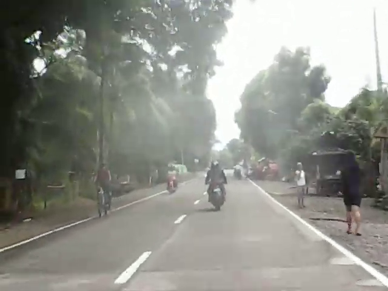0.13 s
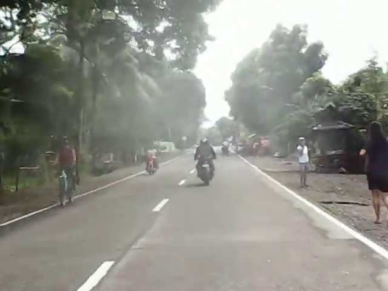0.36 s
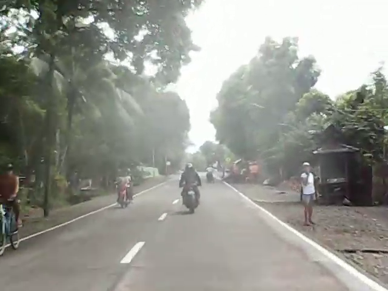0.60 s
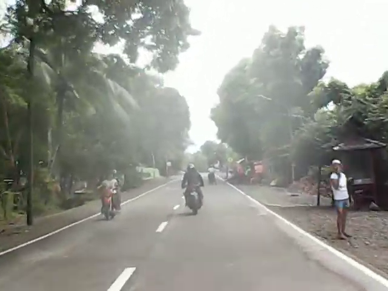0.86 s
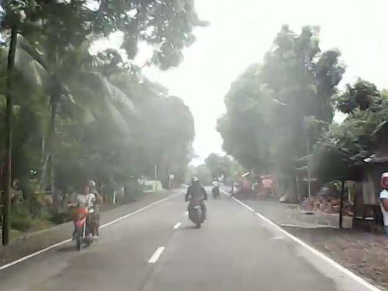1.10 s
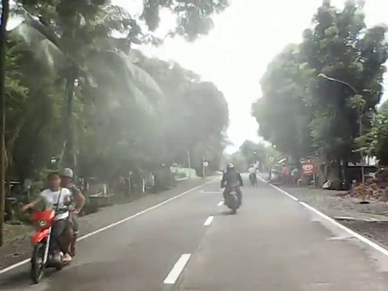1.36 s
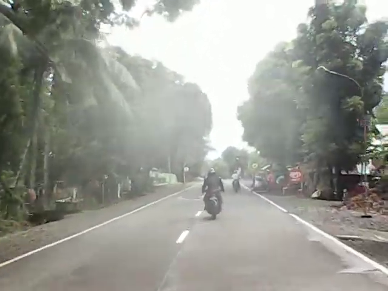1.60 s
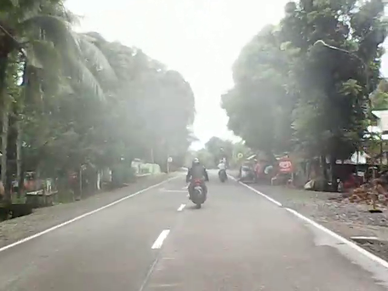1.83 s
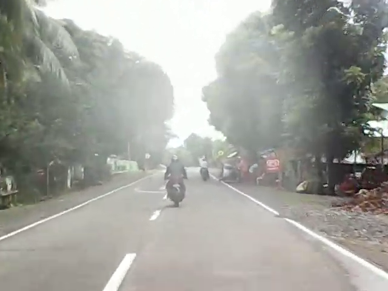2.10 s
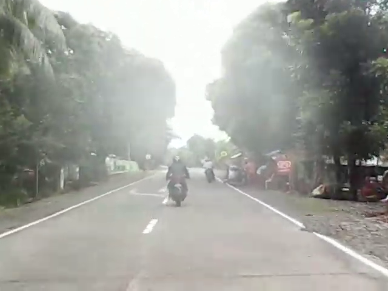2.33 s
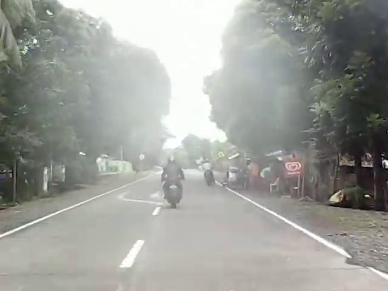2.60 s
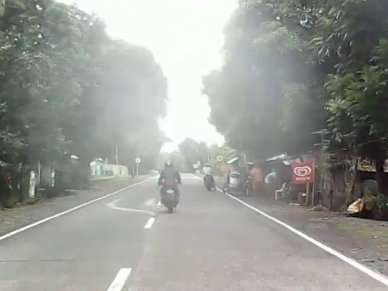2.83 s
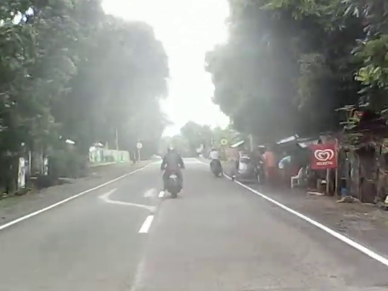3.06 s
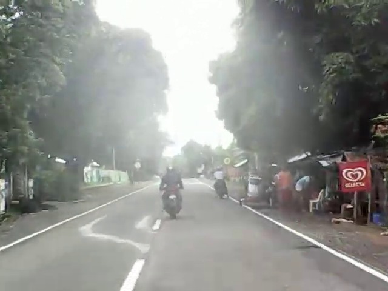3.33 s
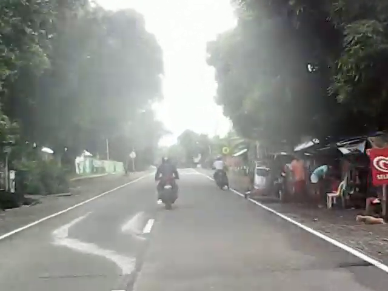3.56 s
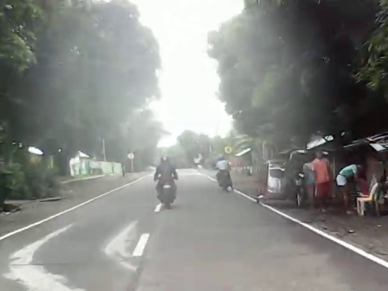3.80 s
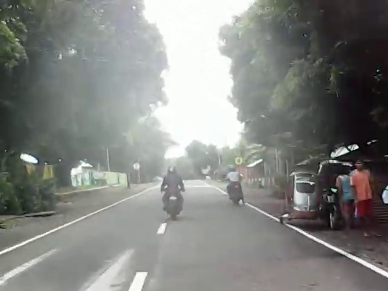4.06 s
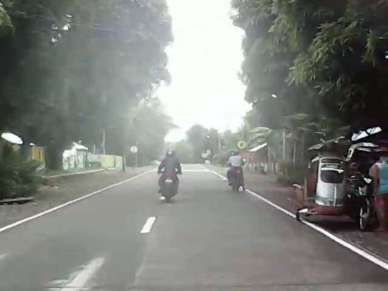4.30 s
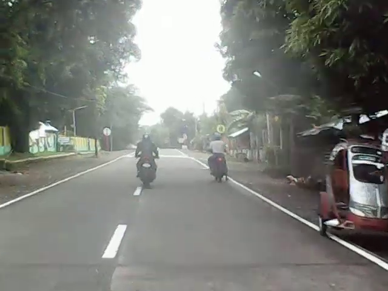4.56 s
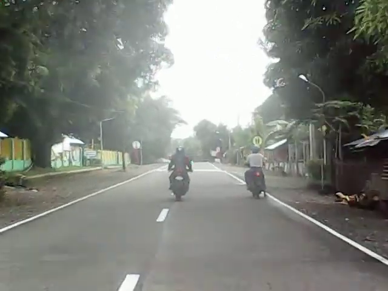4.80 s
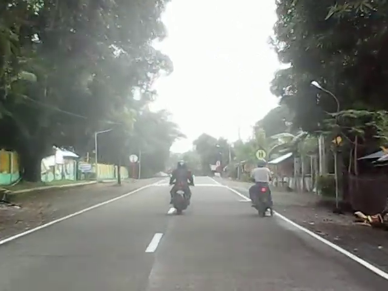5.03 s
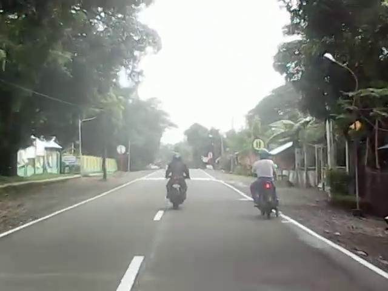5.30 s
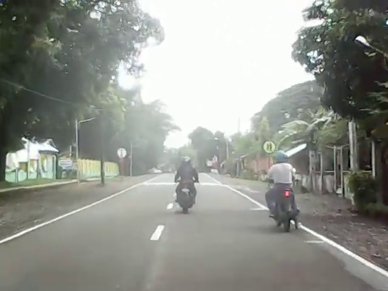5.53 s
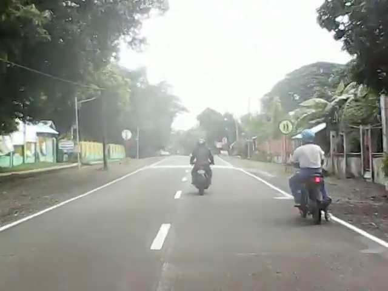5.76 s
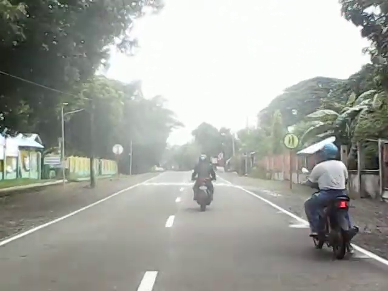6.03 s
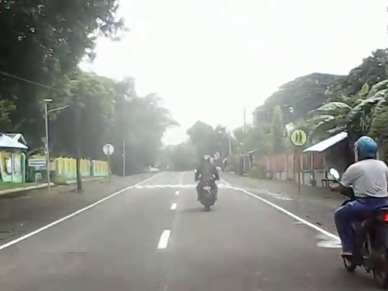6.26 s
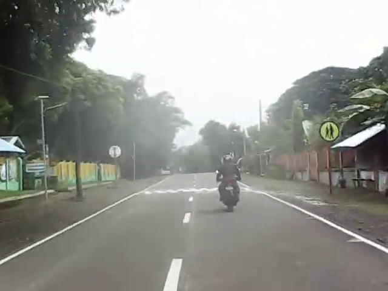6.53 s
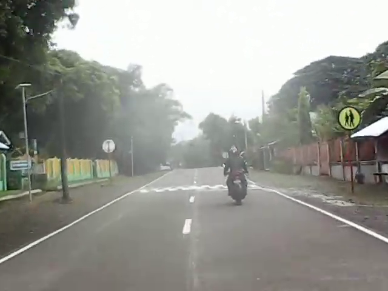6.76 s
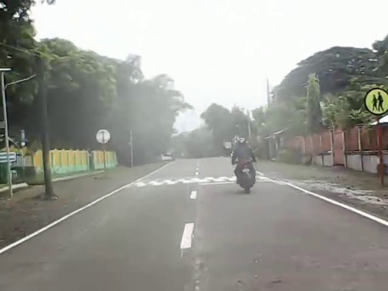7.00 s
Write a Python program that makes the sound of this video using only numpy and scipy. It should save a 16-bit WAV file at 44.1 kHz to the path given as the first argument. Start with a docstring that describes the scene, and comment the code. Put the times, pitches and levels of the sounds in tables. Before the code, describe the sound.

From a moving motorcycle on a country road, a broad tyre and exhaust roar runs throughout, swelling and wavering, with hissing spray and low wind buffeting the microphone. A steady engine hum and faint whine sit inside it. A loose part ticks sharply at irregular moments and bumps give dull thuds. A short double horn toot comes near three seconds, another past five and a half.

```python
"""Tyre roar swells and wavers along a wet road: shaped noise, puffed at the engine firing rate.
Water spray hisses with it, low wind noise buffets the microphone, bumps jolt the frame (short sines).
The engine hums in firing-rate orders, with a narrow-band noise gear whine.
A loose part ticks (a ringing knock with rebounds); a horn of rising partials gives two double toots."""
import sys
import numpy as np
from scipy import signal
from scipy.io import wavfile
from scipy.ndimage import uniform_filter1d

SR = 44100
rng = np.random.default_rng(int(sys.argv[2]) if len(sys.argv) > 2 else 0)


def master(y):
    """Save y as 16-bit WAV."""
    cut = np.clip(np.atleast_2d(y).T, -1, 1)
    pcm = np.round(cut * 32767)  # scale
    wavfile.write(sys.argv[1], SR, pcm.astype(np.int16))


def gain_from_decibels(decibels):
    """Convert decibel values to linear amplitude factors."""
    exponent = np.asarray(decibels, float) / 20
    return 10 ** exponent


N = 314433

# road swell, shared by roar, spray and wind: time_s, roar_band_level_db
ROAD_SWELL = [(0.0, -40), (0.14, -49), (0.22, -42.5), (0.42, -43), (0.46, -42), (0.67, -44), (0.74, -39),
              (0.85, -48), (0.92, -40), (0.99, -43.5), (1.05, -40), (1.13, -44), (1.22, -41.5), (1.3, -43),
              (1.42, -40.5), (1.85, -41), (2.0, -40), (2.3, -41.5), (2.57, -44), (3.05, -40.5),
              (3.41, -44.5), (3.57, -41.5), (3.68, -43), (4.0, -40.5), (4.1, -42), (4.31, -41), (4.62, -43),
              (4.8, -40.5), (4.95, -40), (5.02, -44.5), (5.17, -39.5), (5.4, -42.5), (5.7, -40.5),
              (5.8, -43.5), (6.03, -44.5), (6.5, -42.5), (6.84, -44.5), (6.9, -43), (7.13, -43)]
# roar band in which the road level holds: low_hz, high_hz
ROAR_BAND_HZ = (1120, 1440)
# relative noise densities of tyre roar, wind and spray: frequency_hz, density_db_per_hz
ROAR_SPECTRUM = [(71, -25.5), (120, -13.5), (178, -13), (290, 2.5), (420, -2.5), (454, 1), (623, -5),
                 (866, -4.5), (1000, -7), (1070, -7.5), (1370, -11), (1510, -8), (1910, -19.5),
                 (2420, -25.5), (2800, -26.5), (3640, -51.5), (6160, -120)]
WIND_SPECTRUM = [(15, -26.5), (40, -10), (90, -0.5), (140, 1), (220, -1), (350, -11), (600, -25.5),
                 (1000, -42)]
SPRAY_SPECTRUM = [(1180, -26.5), (2000, 0), (2360, -8), (2900, -6.5), (3350, -7), (3650, -4), (3900, -0.5),
                  (4400, -7), (6190, -21), (6710, -21), (7000, -25), (7230, -33), (9400, -60.5),
                  (15900, -120)]
# wind level and roar depth: time_s, wind_level_db (at mean road level), roar_depth_db_per_octave
GUSTS = [(0, -36.5, 0), (.7, -35.5, 1), (1.5, -40.5, 0.85), (2.4, -39, -0.1), (3.5, -36, -0.1),
         (4.7, -36.5, 0.3), (5.6, -38.5, -0.36), (6.2, -40, 0.1), (7.13, -40, 0.1)]
# engine speed: time_s, firings_per_s
FIRING_RATE = [(0, 34.8), (2, 34.9), (4.5, 34.97), (6.2, 35.1), (7.13, 35.35)]
# engine orders: multiple_of_firing_rate, nominal_level_db_rms
ENGINE_ORDERS = [(1, -62), (2, -58.5), (4, -48.5), (5, -64), (6, -55.5), (7, -55), (8, -49), (10, -62.5),
                 (11, -56), (13, -45.5), (14, -48), (16, -56.5), (20, -56)]
# gear whine: centre_hz, width_hz, level_db_rms
GEAR_WHINE = (1087, 14, -47.5)
# jolts over bumps: start_s, envelope_peak_db, pitch_hz
JOLTS = [(0.309, -29, 140), (0.559, -27, 170), (0.693, -29, 126), (1.059, -31, 106), (2.248, -27.5, 117),
         (2.384, -25, 141), (3.48, -27, 98), (4.839, -28.5, 197), (5.487, -30, 90), (5.928, -29.5, 195),
         (6.198, -26, 93)]
# knocks of the loose part: start_s, peak_db, brightness_db_per_octave, low_body_db
KNOCKS = [(0.2151, -22.5, 5, 8), (0.2155, -22, 0, 2.5), (0.2224, -33, -1, -2.5), (0.2374, -34, -2, 5.5),
          (0.331, -29, -3, 2), (0.5846, -28, -8, 2.5), (0.6373, -33, -9, -4), (0.9365, -18.5, -4, 2.5),
          (0.9512, -39, -4.5, -1), (1.0628, -19.5, -4, -0.5), (1.089, -35, 0, 0), (1.5746, -29, -2, 4),
          (1.6535, -31, -7, 0), (2.228, -29, 2, -3), (2.4101, -28, 3, 1.5), (3.0364, -35, 2, 0),
          (3.3298, -26, 4.5, 0), (3.4147, -31.5, -1.5, -3), (3.426, -35.5, -5, -3), (3.4991, -22, 2, 2),
          (3.5662, -27.5, -3.5, -1), (3.689, -27, -6.5, -1), (4.059, -32.5, -12, -7),
          (4.1203, -33.5, -1, -2), (4.128, -37, -3, -2), (4.334, -31, 4, -3), (4.3617, -32.5, -4.5, 1.5),
          (4.727, -23, -1, -2.5), (5.0212, -29.5, 0.5, 2.5), (6.2835, -31, -6, 3), (6.3839, -22, 2, 1),
          (6.39, -32.5, -2, -2), (6.652, -20, -2, -4), (6.893, -22.5, -1.5, 0), (6.899, -33.5, -2.5, -2)]
# colour of one knock (low body, notch, ringing edge, broad crack): frequency_hz, gain_db
KNOCK_COLOUR = [(300, -24.5), (1000, -16), (1700, -3.5), (2600, -2), (3300, -20), (3750, -5.5), (4000, 8),
                (4500, 1), (5300, -3), (6200, -16), (7000, -32), (9000, -39)]
# late onset of the ringing edge: edge_hz, width_hz, lag_s
RING_LAG = (4000, 700, .0009)
# horn presses: down_s, up_s, level_db, upper_partial_drift_db, extra_fundamental_db
TOOTS = [(2.930, 2.994, -24, -3.5, 0), (3.092, 3.137, -23.5, -2, -0.5), (5.495, 5.578, -24.5, -4.5, 0.5),
         (5.652, 5.7, -28, -0.5, 4.5)]
# horn partials: multiple_of_pitch, relative_level_db
HORN_PARTIALS = [(1, -4.5), (2, -0.5), (3, -20), (4, -4), (5, -13.5), (6, -30), (7, -22), (8, -19.5)]
# horn pitch: start_hz, settled_hz, settling_time_s
HORN_PITCH = (496, 506.8, .03)

MEAN_ROAD_DB = -40.5
FLUTTER_DB, FLUTTER_PER_S = 0.99, 27.3  # quick random wavering of the road level
SPRAY_OFFSET_DB, SPRAY_FOLLOWS = -6, 0.93  # re mean road level; share of swell followed
WIND_FOLLOWS = 0.36  # share of swell followed
LUMPS_DB, LUMPS_PER_S = 1, 16  # random wind lumps
DEPTH_DB_PER_OCTAVE, DEPTH_PER_S = 0.54, 5  # random drift of roar depth
JOLT_RISE_S = 0.0065
REBOUND_SIZE, REBOUND_DECAY_MS = 0.07, 2.1
RECORDER_EDGE_HZ = 7160


def evened(x):
    """Scales to rms 1."""
    return x / np.sqrt(np.mean(x ** 2) + 1e-20)


def curve(rows, column):
    """One column of a time table, interpolated per sample."""
    rows = np.asarray(rows, float)
    return np.interp(np.arange(N) / SR, rows[:, 0], rows[:, column])


def wander(per_s):
    """Twice-averaged white noise: slow smooth drift of rms 1."""
    size = max(int(SR / per_s), 1)
    once = uniform_filter1d(rng.standard_normal(N), size)
    return evened(uniform_filter1d(once, size))


def noise(spectrum, patchy_db, flicker_db, size=1024, tilt_db=0):
    """Random short-time spectra: drifting patches, flicker shared by all bins, tilt about 500 Hz."""
    frames, hz = 4 * N // size + 5, np.fft.rfftfreq(size, 1 / SR)
    real, imag, patches = rng.standard_normal((frames, len(hz), 3)).T
    patches = uniform_filter1d(patches, 10, 0)
    patches = evened(uniform_filter1d(patches, 8, 1))
    flicker = evened(uniform_filter1d(rng.standard_normal(frames), 3))
    table_hz, table_db = np.transpose(spectrum)
    colour_db = np.interp(np.log(hz + 1), np.log(table_hz + 1), table_db, right=-120)[:, None]
    frame_tilt_db = np.resize((tilt_db * np.ones(N))[::size // 4], frames)
    colour_db = colour_db - np.log2((hz[:, None] + 1) / 500) * frame_tilt_db
    gain = gain_from_decibels(colour_db + patchy_db * patches + flicker_db * flicker)
    sound = signal.istft((real + 1j * imag) * gain, nperseg=size, noverlap=3 * size // 4)[1]
    return evened(sound[:N])


def road_db():
    """Road noise level: swell plus quick wavering."""
    return curve(ROAD_SWELL, column=1) + FLUTTER_DB * wander(FLUTTER_PER_S)


def firing_turns():
    """Firings counted over time: the integral of the firing rate."""
    return np.cumsum(curve(FIRING_RATE, column=1)) / SR


def wind(level_db):
    """Lumpy low pressure swings at the microphone, partly following the road swell."""
    swell_db = WIND_FOLLOWS * (level_db - MEAN_ROAD_DB)
    gust_db = curve(GUSTS, column=1) + swell_db + LUMPS_DB * wander(LUMPS_PER_S)
    return gain_from_decibels(gust_db) * noise(WIND_SPECTRUM, patchy_db=-0.2, flicker_db=2.0)


def engine_hum():
    """Sine orders of the firing rate, each wavering in strength."""
    turns = firing_turns()
    hum = np.zeros(N)
    for order, level_db in ENGINE_ORDERS:
        gain = gain_from_decibels(level_db + 2.8 * wander(4.6)) * np.sqrt(2)
        hum += gain * np.cos(2 * np.pi * (order * turns + rng.random()))
    return hum


def gear_whine():
    """White noise through a two-pole resonator: a fuzzy tone."""
    hz, width_hz, level_db = GEAR_WHINE
    radius = np.exp(-np.pi * width_hz / SR)
    poles = [1, -2 * radius * np.cos(2 * np.pi * hz / SR), radius * radius]
    return gain_from_decibels(level_db) * evened(signal.lfilter([1], poles, rng.standard_normal(N)))


def spray(level_db):
    """Hiss of water thrown off the tyres, swelling with the road noise."""
    hiss_db = MEAN_ROAD_DB + SPRAY_OFFSET_DB + SPRAY_FOLLOWS * (level_db - MEAN_ROAD_DB)
    return gain_from_decibels(hiss_db) * noise(SPRAY_SPECTRUM, patchy_db=1.0, flicker_db=1.63, size=512)


def jolts():
    """Each bump gives a short low swing of the frame: a sine under a fast rise and decay."""
    out, t = np.zeros(N), np.arange(4000) / SR
    u = t / JOLT_RISE_S
    envelope = u * np.exp(1 - u)
    for start_s, peak_db, hz in JOLTS:
        swing = envelope * np.sin(2 * np.pi * hz * t)
        out[round(start_s * SR):][:len(t)] += gain_from_decibels(peak_db) * swing
    return out


def knock(bright_db, body_db):
    """Causal ring of the loose part: phase follows from log gain, plus the ringing edge's lag."""
    signed_hz = np.fft.fftfreq(2048, 1 / SR)
    hz = abs(signed_hz) + 1
    table_hz, table_db = np.transpose(KNOCK_COLOUR)
    colour_db = np.interp(np.log(hz), np.log(table_hz), table_db)
    colour_db += np.where(hz < 3300, body_db, bright_db * np.log2(hz / 4000))
    edge_hz, width_hz, lag_s = RING_LAG
    late_share = 1 + np.tanh((hz - edge_hz) / width_hz * 2)
    lag_rad = np.pi * lag_s * width_hz * late_share * np.sign(signed_hz)
    causal_log_gain = np.conj(signal.hilbert(np.log(gain_from_decibels(colour_db))))
    ring = -np.fft.ifft(np.exp(causal_log_gain - 1j * lag_rad)).real[:800]
    return ring / abs(ring).max()


def ticks():
    """A loose part knocks, chattering after first contact; faint knocks come at random."""
    faint_db = -50.0 + 2.4 * np.minimum(rng.exponential(1, N), 4)
    faint = gain_from_decibels(faint_db) * (rng.random(N) < 40 / SR)  # about 40 per s
    out = signal.oaconvolve(faint, knock(.1, .1))[:N]
    t_ms = np.arange(200) / SR * 1000
    chances = rng.standard_normal((len(KNOCKS), 200))
    for (start_s, peak_db, bright_db, body_db), chance in zip(KNOCKS, chances):
        rebounds = REBOUND_SIZE * chance * np.exp(-t_ms / REBOUND_DECAY_MS)
        contact = (t_ms == 0) + rebounds
        sound = np.convolve(contact, knock(bright_db, body_db))
        out[round(start_s * SR):][:len(sound)] += gain_from_decibels(peak_db) * sound / abs(sound).max()
    return out


def horn():
    """A buzzing diaphragm swings up: pitch climbs and wavers, higher partials come in later."""
    out, waver_hz, flutter_db = np.zeros(N), .8 * wander(120), .6 * wander(150)
    start_hz, settled_hz, settle_s = HORN_PITCH
    for down_s, up_s, toot_db, drift_db, low_db in TOOTS:
        held_s = up_s - down_s
        t = np.arange(0, held_s + .04, 1 / SR)
        span = slice(round(down_s * SR), round(down_s * SR) + len(t))
        glide_hz = settled_hz + (start_hz - settled_hz) * np.exp(-t / settle_s)
        turns = np.cumsum(glide_hz + waver_hz[span]) / SR
        swing = np.sin(np.pi / 2 * np.clip(t / 0.028, 0, 1))
        for k, part_db in HORN_PARTIALS:
            ring_on_s = .004 if k > 3 else 0  # the bell keeps upper partials longer
            release = np.exp(-(np.maximum(t - held_s - ring_on_s, 0) / 0.0063) ** 2)
            part_drift_db = (drift_db * (k > 3) - 6 * (k > 6)) * t / held_s
            level_db = toot_db + part_db + low_db * (k == 1) + part_drift_db + flutter_db[span]
            envelope = np.sqrt(2) * gain_from_decibels(level_db) * swing ** (0.97 * k) * release
            out[span] += envelope * np.cos(2 * np.pi * k * turns + 0.67 * k * k)
    return out


def roar(level_db):
    """Tyre and exhaust roar: noise puffed up slightly by every firing, its depth drifting."""
    puff_db = .9 * np.cos(2 * np.pi * firing_turns())
    tilt_db = curve(GUSTS, column=2) + DEPTH_DB_PER_OCTAVE * wander(DEPTH_PER_S)
    body = noise(ROAR_SPECTRUM, patchy_db=0.5, flicker_db=1.0, size=512, tilt_db=tilt_db)
    band_filter = signal.butter(4, ROAR_BAND_HZ, "bandpass", fs=SR, output="sos")
    band = signal.sosfilt(band_filter, body)
    return gain_from_decibels(level_db + puff_db) * body / band.std()


def scene():
    """All sources add up at one microphone."""
    level_db = road_db()
    mix = wind(level_db) + engine_hum() + gear_whine() + spray(level_db)
    mix += jolts() + ticks() + horn() + roar(level_db)
    return mix[None]


def top_cut(x):
    """Nothing passes above the cut-off."""
    return signal.sosfilt(signal.butter(12, 7380, fs=SR, output="sos"), x)


def record(dry):
    """Narrow-band recorder: a linear-phase low-pass."""
    lowpass = signal.firwin(255, RECORDER_EDGE_HZ, window=("kaiser", 9), fs=SR)
    narrow = signal.oaconvolve(dry, lowpass[None], "same")
    return top_cut(narrow)


dry = scene()
out = record(dry)
master(out)
```